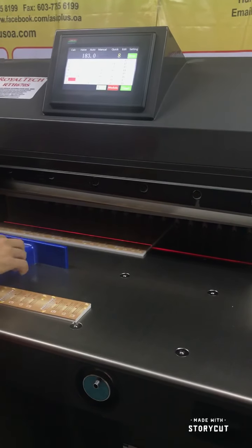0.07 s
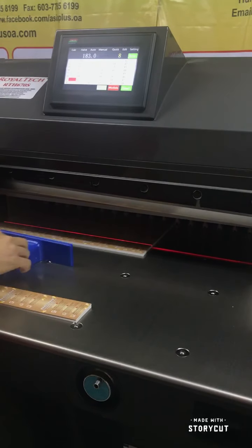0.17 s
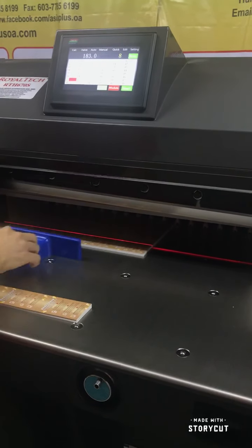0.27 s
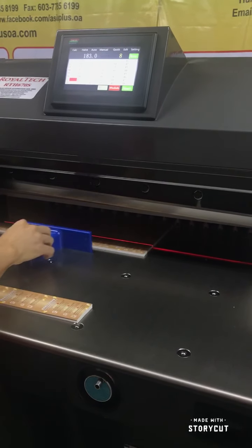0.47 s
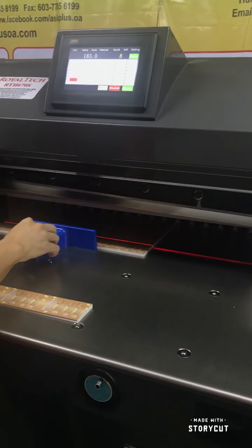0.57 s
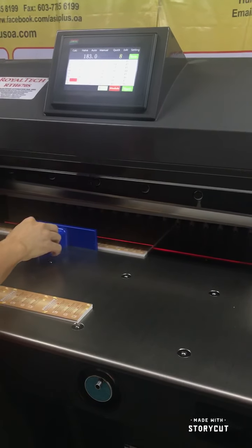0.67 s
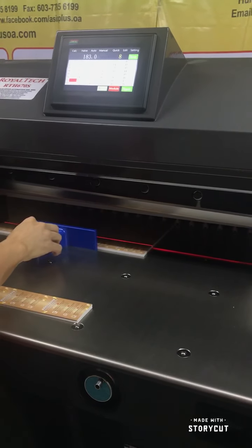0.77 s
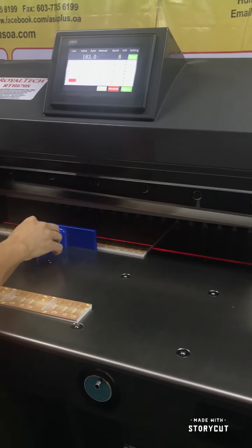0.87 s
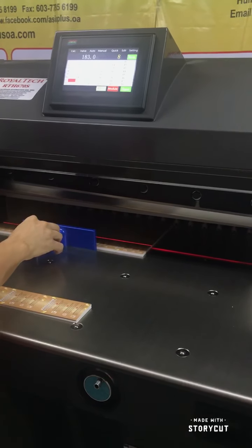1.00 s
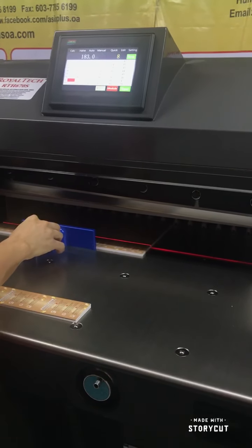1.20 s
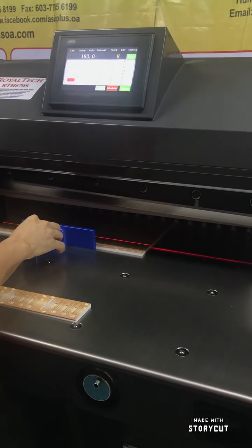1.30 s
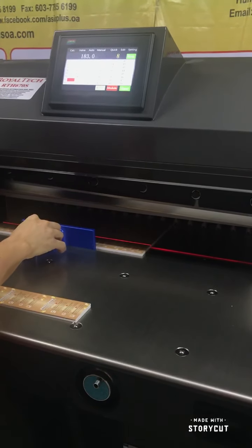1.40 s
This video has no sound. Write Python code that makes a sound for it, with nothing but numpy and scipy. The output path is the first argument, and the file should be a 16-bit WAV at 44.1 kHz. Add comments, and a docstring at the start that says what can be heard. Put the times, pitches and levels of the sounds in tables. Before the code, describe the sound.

Close by, a plastic block clatters and slides over a paper cutter's metal table, ending in one sharp knock against stacked paper. It rubs softly and taps once more, while a machine hums faintly in a quietly hissing room.

```python
"""A machine's motor hums in a hissing room. With a brief rub, a hard plastic block lands on the steel table
of a paper cutter (0.2 s), each impact exciting its damped modes. It scrapes forward by stick-slip friction,
its corners ticking on the steel, and knocks against a paper stack (0.31 s); the table's lower modes thud
under the blow. The block rubs on the paper once more (0.55 s) and gives a light tap (0.65 s).
Reflections from the housing and the room follow each of its sounds."""
import sys
import numpy as np
from scipy import signal
from scipy.fft import rfft, irfft
from scipy.io import wavfile

SR = 44100
rng = np.random.default_rng(int(sys.argv[2]) if len(sys.argv) > 2 else 0)


def output_pcm(signal):
    """Save a mono or channel-first signal as 16-bit PCM at the path in sys.argv[1].

    Samples are clipped to [-1, 1] before scaling.
    """
    pcm = np.clip(np.atleast_2d(signal).T, -1, 1) * 32767
    wavfile.write(sys.argv[1], SR, np.round(pcm).astype(np.int16))


N = 63945
HZ, TIME = np.fft.rfftfreq(N, 1 / SR), np.arange(N) / SR

# normal modes of the block: f/Hz, level/dB, T60/s
BLOCK_MODES = [(623.4, -18, 0.12), (664.7, -20, 0.11), (875, -19.5, 0.082), (1237, 0.5, 0.052),
               (1299.6, -4, 0.065), (1373, -6, 0.035), (1523, -4, 0.034), (1641, -2.5, 0.048),
               (1984, -1, 0.063), (2200, -10, .04), (3266, -15.5, 0.057), (3376, -18, 0.04),
               (4650, -11, 0.03), (4643, -18.5, 0.026)]
# spectrum of the dense, short-lived resonances of block and table: f/Hz, level/dB
CLATTER_SPECTRUM = [(40, -49), (130, -36), (300, -14), (600, -3.5), (1050, -5.5), (1300, 3.5), (1650, -3.5),
                    (1820, -9.5), (2050, 1), (2800, -12.5), (3400, -7), (4650, -11), (5300, -23),
                    (6500, -18.5), (7500, -28), (9000, -27), (10500, -47.5)]


def amp(db):
    """Amplitude ratio of a level in decibels."""
    return 10 ** (np.asarray(db) / 20)


def unit(x):
    """Normalisation to rms 1."""
    return x / np.sqrt(np.mean(x ** 2) + 1e-20)


def read(points, hz):
    """Interpolation on a logarithmic frequency axis."""
    f, value = np.transpose(points)
    return np.interp(np.log(hz + 1), np.log(f + 1), value)


def add(mix, s, sound):
    """Superposition of a sound that starts at s seconds."""
    part = mix[round(s * SR):][:len(sound)]
    part += sound[:len(part)]


def colour(x, spectrum, tilt_db=0):
    """Spectral shaping to rms 1, with a tilt per octave above 300 Hz."""
    gain = amp(read(spectrum, HZ) + tilt_db * np.log2(np.maximum(HZ, 300)))
    return unit(irfft(rfft(x) * gain, N))


def noise(spectrum, tilt_db=0):
    """Stationary Gaussian noise, spectrally shaped."""
    return colour(rng.standard_normal(N), spectrum, tilt_db)


def drift(hz):
    """Slow random fluctuation: noise low-passed at hz."""
    return unit(irfft(rfft(rng.standard_normal(N)) / (1 + (HZ / hz) ** 4), N))


def ring(modes, rise_s, tilt_db=0, detune=0):
    """Free vibration: damped modes of alternating sign, tilted per octave about 1500 Hz."""
    shift = 1 + detune * rng.standard_normal(len(modes))
    tones = np.zeros(N)
    for k, (hz, db, t60) in enumerate(modes):
        envelope = amp(db + tilt_db * np.log2(hz / 1500) - 60 * TIME / t60)
        tones += (-1) ** k * envelope * np.sin(2 * np.pi * hz * shift[k] * TIME)
    return tones * (1 - np.exp(-TIME / rise_s))


def burst(spectrum, rise_s, t60, tilt_db=0):
    """Modal overlap: dense resonances merge into exponentially decaying noise."""
    return noise(spectrum, tilt_db) * amp(-60 * TIME / t60) * (1 - np.exp(-TIME / rise_s))


def motor_hum():
    """Random amplitude and phase modulation make the motor's partials waver."""
    # motor partials: f/Hz, rms level/dB
    partials = [(67, -67.5), (100.4, -56), (136.5, -59.5), (264, -69.5), (291, -84)]
    out = np.zeros(N)
    for hz, db in partials:
        waver = 1 + 0.26 * drift(hz=4.6)
        phase = 2 * np.pi * (hz * TIME + rng.random()) + 0.5 * drift(hz=4.6)
        out += amp(db) * np.sqrt(2) * waver * np.sin(phase)
    return out


def room_hiss():
    """Stationary broadband noise forms the room's noise floor."""
    # background spectrum: f/Hz, relative level/dB
    spectrum = [(15, -50), (27, -18.5), (45, -9), (70, -9), (170, -14), (215, -12), (280, -12.5),
                (450, -19), (750, -19), (1300, -19.5), (3200, -27), (9000, -30), (10000, -42.5),
                (11000, -78)]
    return amp(-53.5) * noise(spectrum)


def rubs():
    """Friction against paper gives noise in soft Gaussian swells."""
    # swells: centre t/s, width/s, level/dB, tilt/(dB/octave)
    swells = [(0.179, 0.014, -44, 12), (.536, 0.012, -44.5, 1.5), (.55, 0.11, -53, 3)]
    # paper friction spectrum: f/Hz, level/dB
    spectrum = [(150, -37), (600, 11), (900, 0.5), (1200, 6.5), (2000, -2), (2800, -9.5), (4000, -7.5),
                (5500, -24.5), (10000, -40.5)]
    return sum(noise(spectrum, tilt_db) * amp(db) * np.exp(-.5 * ((TIME - s) / width) ** 2)
               for s, width, db, tilt_db in swells)


def slide():
    """Stick-slip friction: tiny slips on the steel scratch and drive the block's modes."""
    # friction envelope: t/s, level/dB
    friction = [(.2, -73), (.206, -36.5), (.228, -36), (.24, -37.5), (.254, -36), (.264, -40.5),
                (.272, -30), (.289, -34), (.298, -44.5), (.31, -33), (.33, -90)]
    # scratch spectrum: f/Hz, level/dB
    spectrum = [(100, -24), (350, -2), (560, -7), (680, 5.5), (820, -4.5), (1000, 4.5), (1400, 4.5),
                (2100, 1.5), (2800, -4.5), (4700, -8.5), (7500, -11), (9000, -12), (10500, -28)]
    slips_per_s, spread_db, ring_db = 5400, 2, -5.5
    slips = rng.standard_normal(N) * (rng.random(N) < slips_per_s / SR)
    slips *= amp(spread_db * np.minimum(rng.exponential(1, N), 3))
    force = amp(np.interp(TIME, *np.transpose(friction), left=-120, right=-120))
    body = ring(BLOCK_MODES, rise_s=0.00043)
    ringing = signal.fftconvolve(unit(slips) * force, body / np.linalg.norm(body))[:N]
    return colour(slips, spectrum) * force + amp(ring_db) * ringing


def knocks():
    """Impact excitation: the block rings and clatters as it lands, catches and hits the stack."""
    # impacts: t/s, ring level/dB, ring tilt/(dB/octave), clatter level/dB, clatter tilt/(dB/octave),
    # rise/s, clatter T60/s
    impacts = [(0.2007, -45, -7, -28.5, -4, .0003, 0.024), (.2085, -31.5, -10, -26.5, -0.5, .001, 0.048),
               (.222, -36.5, -12, -32.5, -4.5, .001, 0.043), (0.268, -27, 7, -22, 2, 0.0011, 0.044),
               (.2720, -28, 11.5, -26, -0.5, 0.0015, 0.044), (.2835, -30, -6.5, -29.5, 20, 0.0029, 0.065),
               (0.3115, -31.5, 10.5, -18, 0.5, 0.00017, 0.019),
               (0.3134, -11.5, -2, -19.5, 1, 0.0021, 0.072),
               (0.3282, -24.5, -8.5, -26, -1.5, 0.00051, 0.082)]
    grip_detune = 0.0078  # the grip shifts each mode a little from blow to blow
    out = np.zeros(N)
    for s, ring_db, ring_tilt, clatter_db, clatter_tilt, rise_s, t60 in impacts:
        ringing = amp(ring_db) * ring(BLOCK_MODES, rise_s, ring_tilt, grip_detune)
        clatter = amp(clatter_db) * burst(CLATTER_SPECTRUM, rise_s, t60, clatter_tilt)
        add(out, s, ringing + clatter)
    return out


def ticks():
    """Brief contact excites high frequencies: a corner catches on the steel."""
    # catches: t/s, level/dB
    catches = [(0.201, -37), (0.211, -30), (0.2761, -38), (0.2871, -30), (0.31, -42)]
    # tick spectrum: f/Hz, level/dB
    spectrum = [(300, -30.5), (1500, -8), (3500, -2), (5100, 5.5), (5800, -4), (6500, 6), (7500, -6.5),
                (8800, 4), (10500, -11)]
    out = np.zeros(N)
    for s, db in catches:
        add(out, s, amp(db) * burst(spectrum, rise_s=0.00032, t60=0.022))
    return out


def table_thuds():
    """Modal response of the steel table, building up and decaying after the blow."""
    # thuds: t/s, level/dB
    onsets = [(.319, -36.5), (.3345, -33), (.3555, -33)]
    # table modes: f/Hz, level/dB, T60/s
    modes = [(122, -12, 0.18), (169, -3, 0.2), (249.6, -4.5, 0.25), (308.9, 2.5, 0.16), (365.7, -0.5, 0.11),
             (428, -8, 0.17), (483, -3, .07), (607, -10, .13), (1000, -11, 0.13), (1280, -5, .07),
             (1652, -2, 0.11), (2570, -13, .06)]
    thud = ring(modes, rise_s=0.009)
    out = np.zeros(N)
    for s, db in onsets:
        add(out, s, amp(db) * thud)
    return out


def tap():
    """Double impact: an edge of the block clicks down, then its face sets the modes ringing."""
    # contacts: t/s, ring level/dB, click level/dB
    contacts = [(0.6527, -46, -35), (0.6561, -28.5, -45)]
    # modes excited by the tap: f/Hz, level/dB, T60/s
    modes = [(509, -16, 0.13), (626, -21.5, 0.17), (940, -13, 0.053), (1028, -19.5, 0.18),
             (1282, -5, 0.048), (1397, 0, 0.039), (1575, 2.5, 0.048), (1588, -14, .11), (1660, -2, 0.022),
             (2116, -10.5, 0.027), (3040, -7, 0.018), (3530, -21, 0.02)]
    rise_s = 0.00061
    out = np.zeros(N)
    for s, ring_db, click_db in contacts:
        click = amp(click_db) * burst(CLATTER_SPECTRUM, rise_s, t60=0.032)
        add(out, s, amp(ring_db) * ring(modes, rise_s) + click)
    return out


def room(direct):
    """Reverberation: early reflections from the machine's housing, then the room's diffuse tail."""
    # reverberation time: f/Hz, T60/s
    decay_times = [(150, 0.62), (600, 0.47), (1600, 0.33), (4000, 0.35), (9000, 0.34)]
    echoes_per_s, early_t60, early_db, late_db = 4000, 0.056, -9.5, -10
    early, late = rng.standard_normal((2, N)) * (rng.random((2, N)) < echoes_per_s / SR)
    early *= amp(-60 * TIME / early_t60) * (TIME > .003)
    hz, t, bands = signal.stft(late, SR, nperseg=256)
    bands *= amp(-60 * t / read(decay_times, hz)[:, None])
    late = signal.istft(bands, SR, nperseg=256)[1][:N] * (TIME > 0.011)
    response = amp(early_db) * early / np.linalg.norm(early) + amp(late_db) * late / np.linalg.norm(late)
    return direct + signal.fftconvolve(direct, response)[:N]


def scene():
    """Superposition of the reverberant contact sounds, the hum and the hiss."""
    contacts = knocks() + ticks() + table_thuds() + tap() + slide() + rubs()
    bass_cut = signal.butter(2, 130, "high", fs=SR, output="sos")  # the contact sounds carry little bass
    return (room(signal.sosfilt(bass_cut, contacts)) + motor_hum() + room_hiss())[None]


def record(dry):
    """Band limiting by a linear-phase low-pass at 10050 Hz."""
    lowpass = signal.firwin(401, 10050, window=("kaiser", 8), fs=SR)
    return signal.oaconvolve(dry, lowpass[None], "same")


dry = scene()
out = record(dry)
output_pcm(out)
```